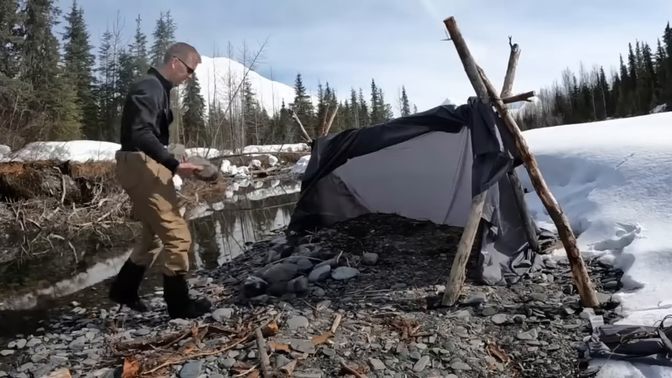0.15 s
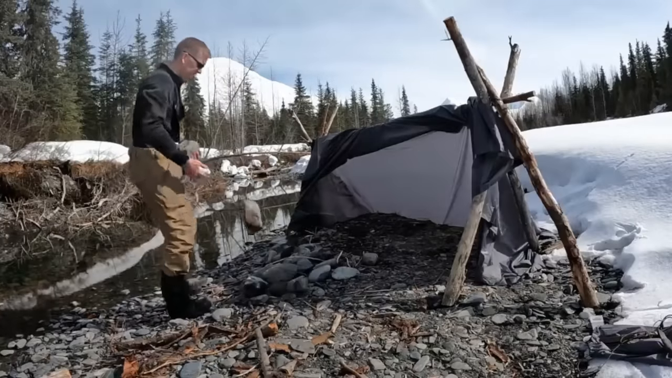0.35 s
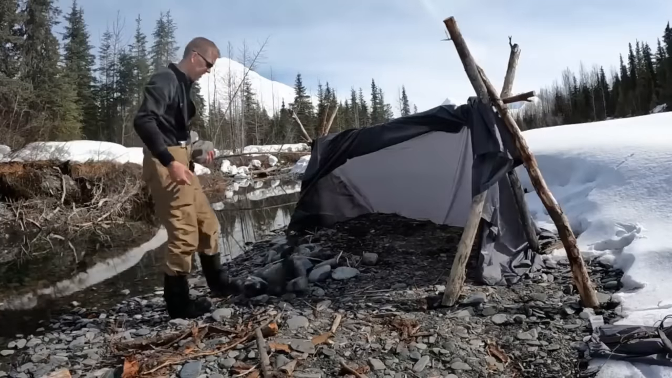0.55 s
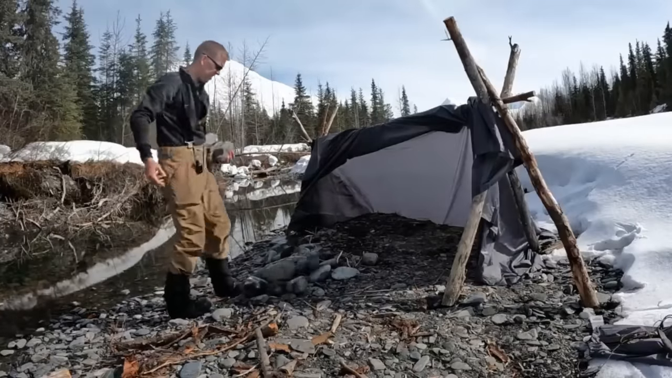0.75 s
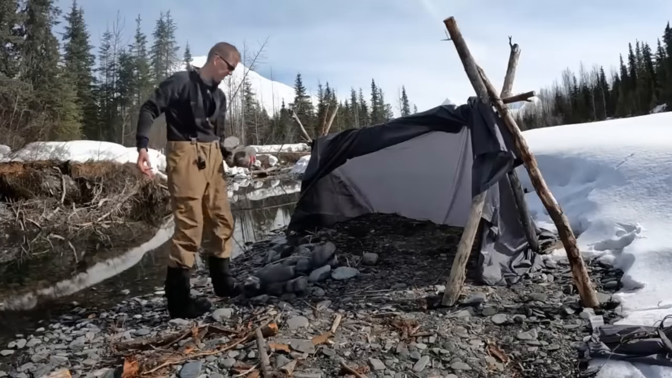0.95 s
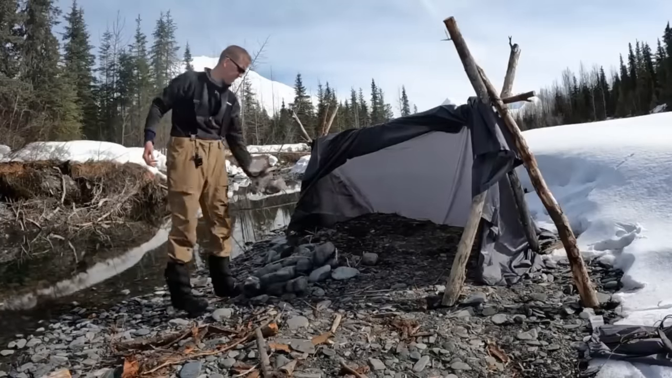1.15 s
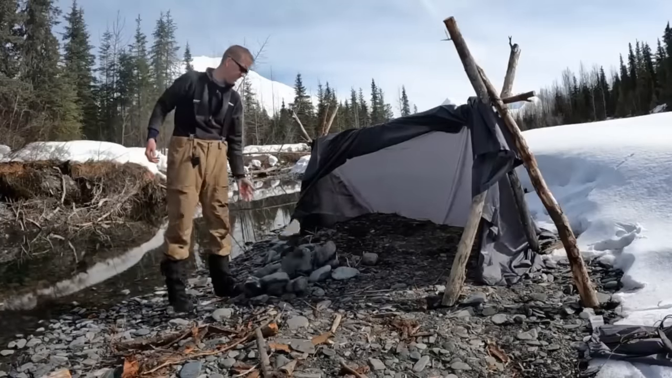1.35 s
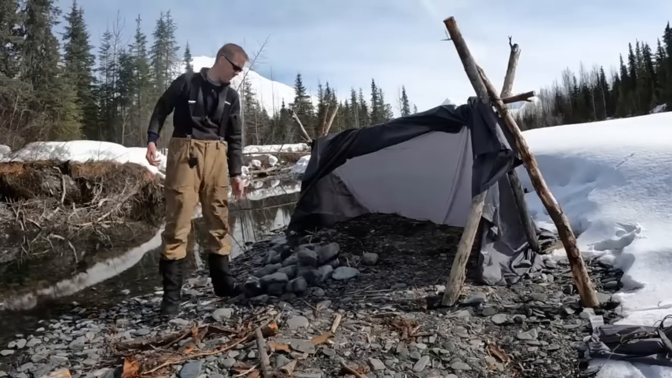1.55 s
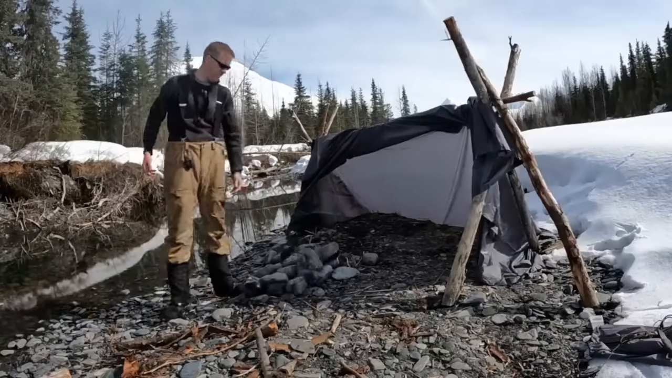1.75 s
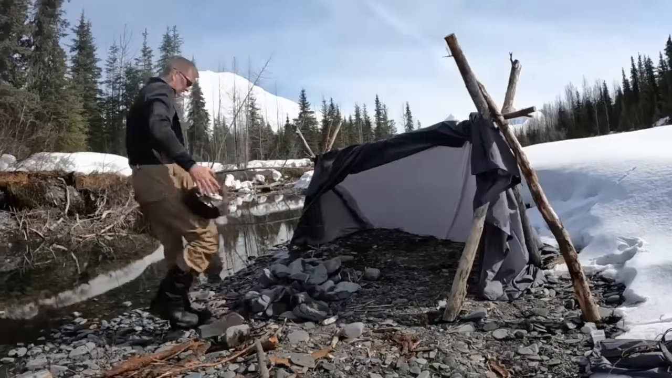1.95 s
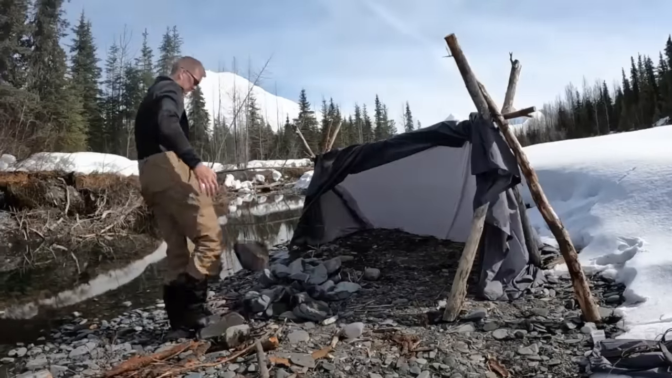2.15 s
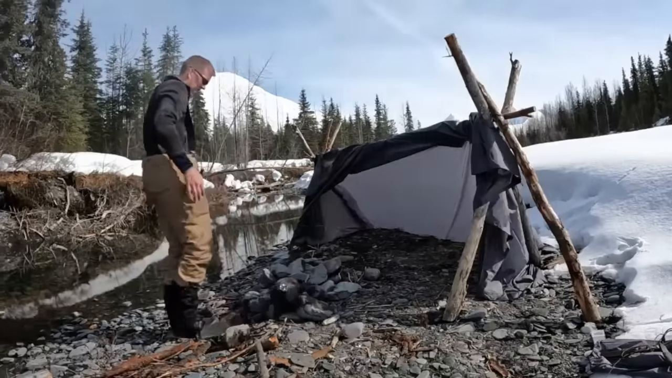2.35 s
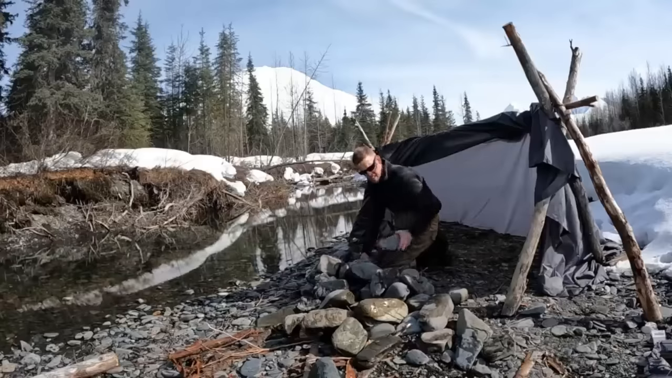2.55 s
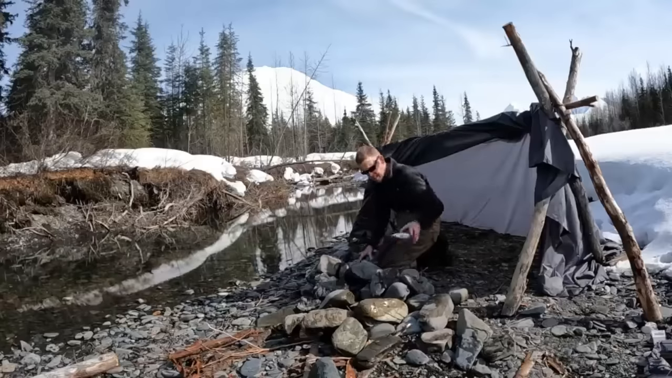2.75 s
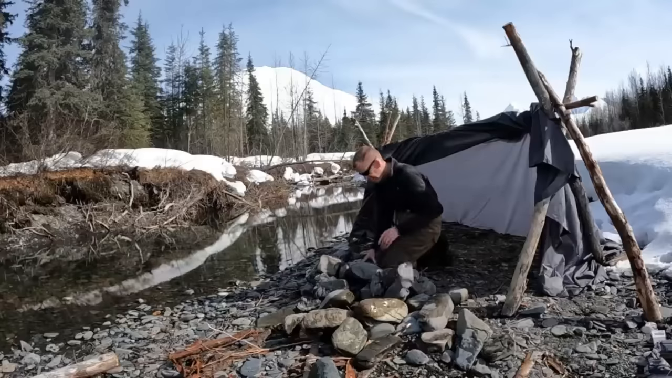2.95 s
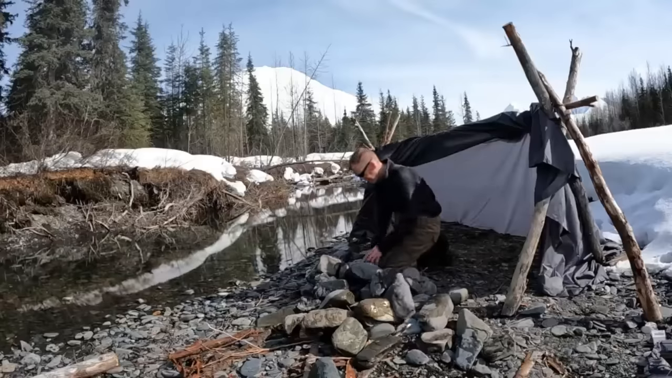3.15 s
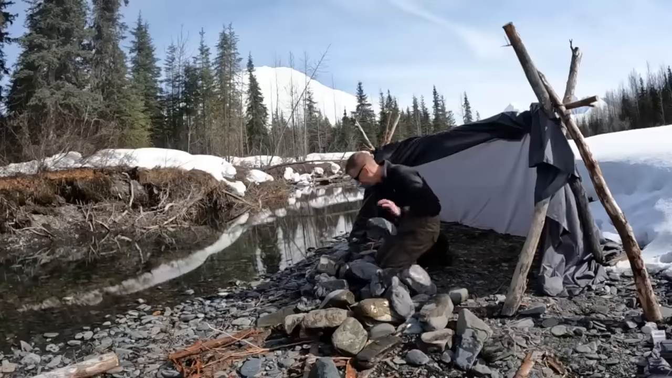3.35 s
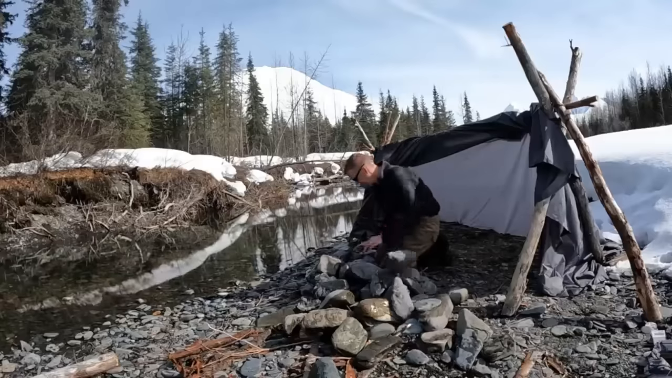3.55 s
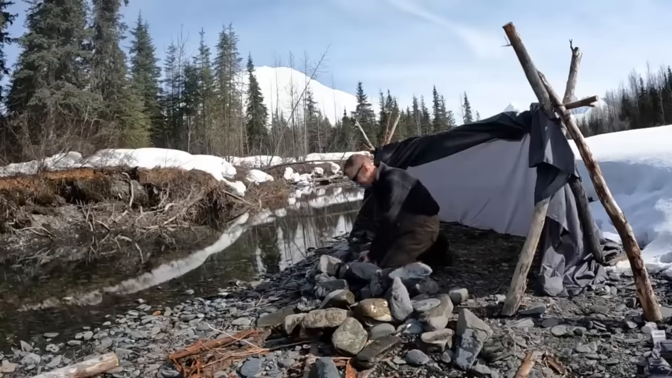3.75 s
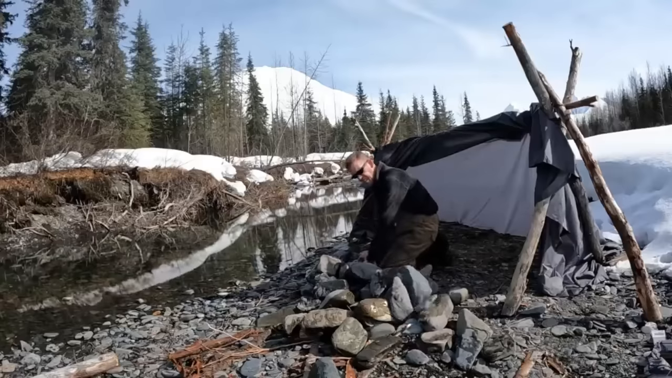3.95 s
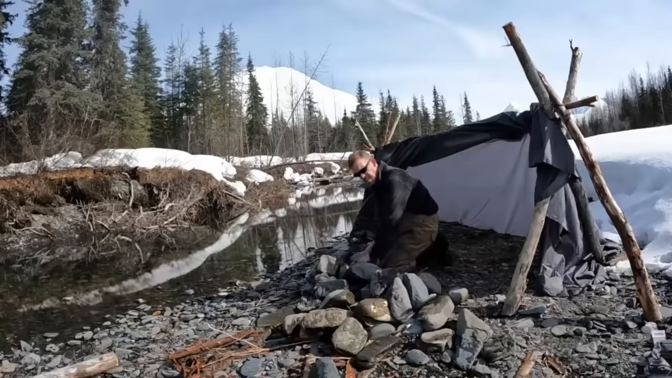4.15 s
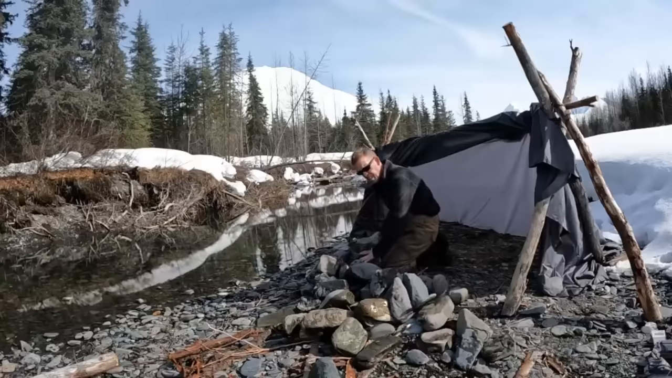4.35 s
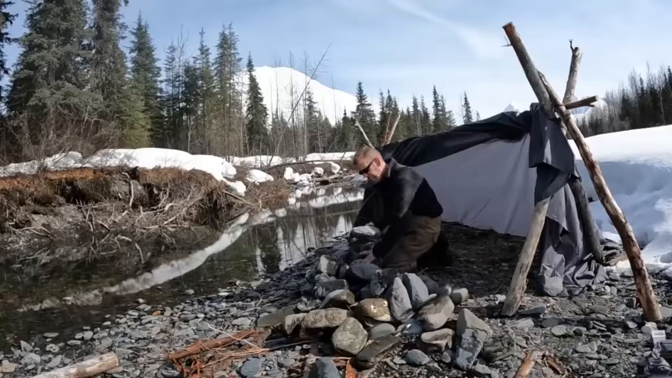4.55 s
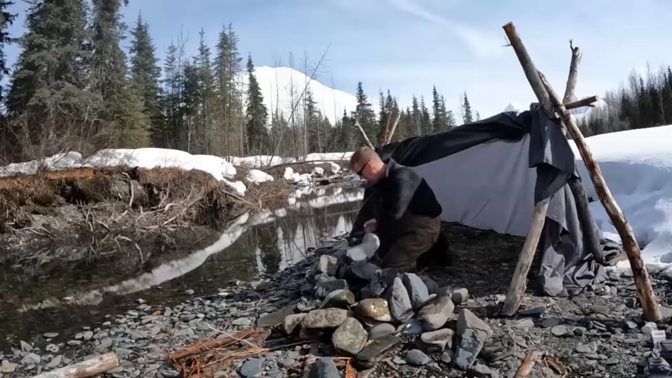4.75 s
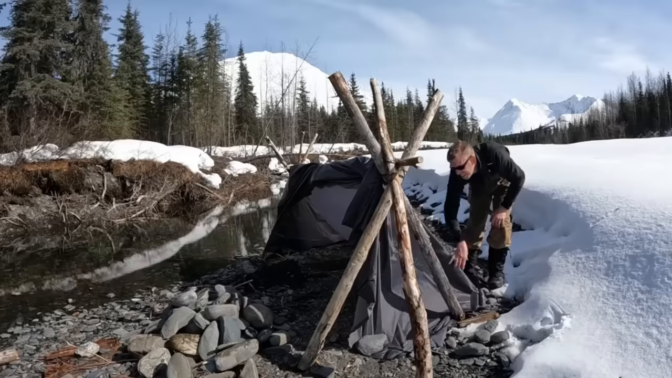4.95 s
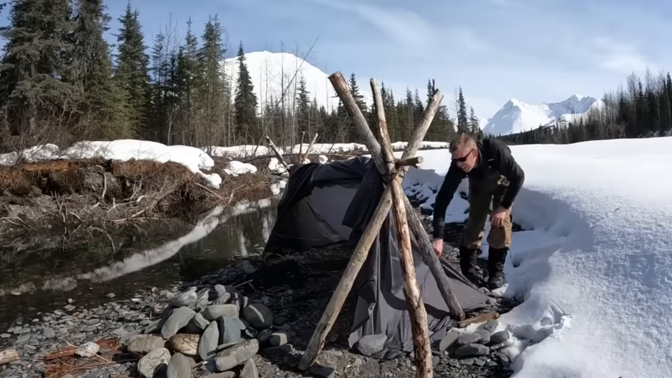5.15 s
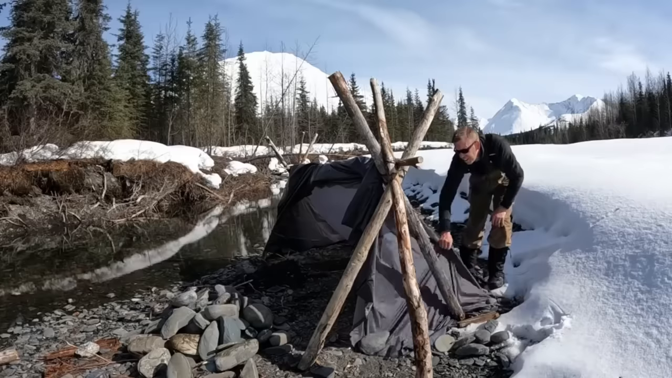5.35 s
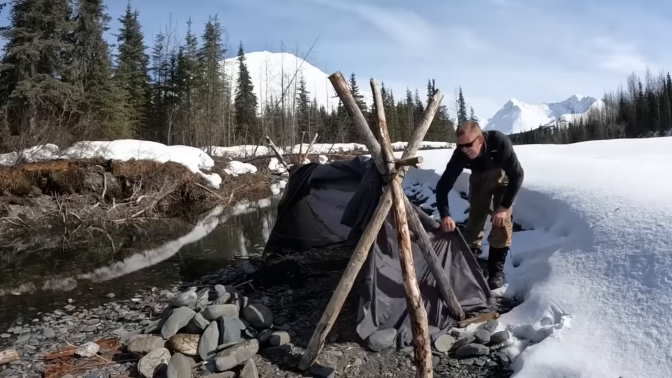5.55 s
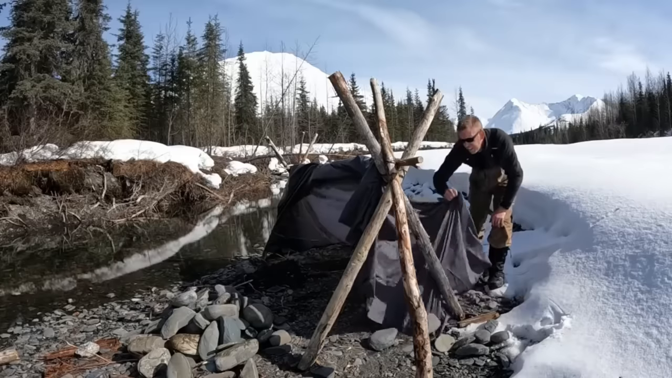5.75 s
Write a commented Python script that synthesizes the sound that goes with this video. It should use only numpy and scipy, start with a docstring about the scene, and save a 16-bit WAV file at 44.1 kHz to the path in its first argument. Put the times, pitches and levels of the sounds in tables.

```python
"""A gravel bank in open air: a person in waders drops and stacks river cobbles, a few metres from the microphone.
Stones clack as struck, dying resonances, heavy ones thud as sinking tones, and a flat slab clinks in its own modes.
Pebbles shift underfoot as showers of small resonant ticks; waders swish as coloured noise in strokes.
Light wind buffets the microphone as low noise, and at the end a tarp is dragged taut with a rising hiss."""
import sys
import numpy as np
from scipy import signal
from scipy.fft import rfft, irfft, next_fast_len
from scipy.io import wavfile

SR = 44100
rng = np.random.default_rng(int(sys.argv[2]) if len(sys.argv) > 2 else 0)


def store_wav(level_fs):
    """Save 16-bit WAV to argv[1]."""
    pcm = np.round(np.clip(np.atleast_2d(level_fs), -1, 1) * 32767)
    wavfile.write(sys.argv[1], SR, pcm.T.astype(np.int16))


N = 259729
HIT = 4096   # samples in one hit
AGE = np.arange(HIT) / SR   # seconds since the hit began


def from_db(db):
    """Decibels to gain."""
    return 10 ** (np.asarray(db) / 20)


def rms_one(x):
    """Scale to rms 1."""
    return x / np.sqrt(np.mean(x ** 2) + 1e-20)


def unit_hit(x):
    """Scale to the energy of one millisecond at rms 1."""
    return x / np.sqrt(np.sum(x ** 2) * 1000 / SR + 1e-20)


def cut(x, hz, kind, order=2):
    """Butterworth filter."""
    sos = signal.butter(order, np.minimum(hz, .45 * SR), kind, fs=SR, output="sos")
    return signal.sosfilt(sos, x + 1e-18)


def resonate(x, hz, width_hz):
    """One resonance, gain about 1 on top."""
    r = np.exp(-np.pi * width_hz / SR)
    zeros = np.array([1, 0, -1]) * (1 - r * r) / 2
    poles = [1, -2 * r * np.cos(2 * np.pi * hz / SR), r * r]
    return signal.lfilter(zeros, poles, x + 1e-18)


def fade(t60):
    """Exponential decay over the length of a hit, 60 dB in t60 seconds."""
    return np.exp(-np.log(1000) * AGE / t60)


def mode(hz, t60):
    """A struck, dying sine."""
    return np.sin(2 * np.pi * hz * AGE) * fade(t60)


def drift(rate):
    """Smooth random curve of rms 1, with rate new values per second."""
    knots = rng.standard_normal(int(N / SR * rate) + 3)
    return rms_one(np.interp(np.arange(N) / SR * rate, np.arange(len(knots)), knots))


def coloured(x, spectrum):
    """Give a steady texture its spectrum, rolled off below the lowest point; rms 1."""
    size = next_fast_len(N)
    hz, db = np.transpose(spectrum)
    freqs = np.arange(size // 2 + 1) * SR / size + 1
    low_rolloff = 1 + (hz[0] / 2 / freqs) ** 2
    gain = from_db(np.interp(np.log(freqs), np.log(hz), db)) / low_rolloff
    return rms_one(irfft(rfft(x, size) * gain, size)[..., :N])


def grains(per_s, spread_db):
    """Random clicks of uneven size."""
    happens = rng.random(N) < per_s / SR
    sign = rng.choice([-1, 1], N)
    return happens * sign * from_db(spread_db * np.minimum(rng.exponential(1, N), 4))


def stereo(mid, side, side_db):
    """Left and right from a shared and an opposed part."""
    return mid + from_db(side_db) * side * np.array([[1], [-1]])


def add(track, s, sound):
    """Mix a sound in at time s."""
    i = int(s * SR)
    track[i:i + len(sound)] += sound[:N - i]


def swells(rows, attack_s, release_t60, rise_db_per_s=0):
    """Gain of moves (start s, length s, dB): each swells up to its start, holds or rises, then dies away."""
    power = np.zeros(N)
    for start, length, db in rows:
        # the swell-up comes before the start, as far as time zero allows
        t = np.arange(-min(attack_s, start), length + 1.5 * release_t60, 1 / SR)
        attack = np.clip(1 + t / attack_s, 0, 1) ** 2
        release = np.exp(-np.log(1000) * np.maximum(t - length, 0) / release_t60)
        level = from_db(db + rise_db_per_s * np.clip(t, 0, length))
        add(power, start + t[0], (attack * release * level) ** 2)
    return np.sqrt(power)


def contact(tail_t60):
    """One sharp blow, and the micro-bounces and scatter from the stones around it, of equal energy."""
    scatter = rng.standard_normal(HIT) * fade(tail_t60) * (1 - np.exp(-AGE / 0.00018))
    return signal.unit_impulse(HIT), scatter / np.linalg.norm(scatter)


def stone_ring(hz, octaves, t60):
    """Every stone has short modes of its own, strongest near the pitch hz."""
    steps = octaves + rng.normal(0, .09, size=len(octaves))
    ring = 0
    for step in steps:
        ring = ring + rng.choice([-1, 1]) * from_db(-10 * step ** 2) * mode(hz * 2 ** step, t60)
    return unit_hit(ring)


# Stone knocking on stone, a few metres off.
# Each row: time in seconds, body level in dB over 1 ms relative to the other blows, colour in Hz.
COBBLES = [(0.138, -37.5, 1106), (0.615, -20, 1090), (0.6263, -4.5, 1580), (0.649, -26.5, 1320),
           (0.684, -21.5, 2030), (0.687, -9, 1912), (0.6975, -13, 1360), (0.7238, -29, 1000),
           (0.7346, -20, 860), (0.813, -26, 1000), (0.893, -31.5, 1280), (0.9239, -23.5, 1290),
           (0.9359, -20, 868), (0.9697, -31.5, 1190), (1.027, -27, 1015), (1.037, -15.5, 1440),
           (1.0616, -31.5, 1010), (1.1425, -35, 1670), (1.209, -20.5, 1297), (1.3685, -14.5, 1490),
           (1.412, -28, 1290), (1.4691, -26.5, 1450), (1.479, -6, 1470), (1.51, -10.5, 1432),
           (1.5145, -12, 1550), (1.5267, -21, 1560), (1.5479, -12, 2060), (1.5589, -11.5, 2090),
           (1.5625, -19, 1280), (1.571, -16.5, 1370), (1.614, -15.5, 1590), (1.6752, -19, 950),
           (1.875, -17, 1530), (1.9271, -24, 1394), (2.2372, -25.5, 1320), (2.3735, -30, 970),
           (2.3844, -7, 1015), (2.393, -18.5, 1210), (2.3985, -12.5, 1050), (2.401, -12.5, 1840),
           (2.435, -26.5, 1200), (2.4659, -15, 1744), (2.48, -29, 1230), (2.701, -26, 966),
           (3.009, -31.5, 1070), (3.052, -28.5, 1560), (3.0637, -7.5, 1756), (3.1421, -31.5, 1270),
           (3.1756, -11, 1490), (3.23, -25, 1080), (3.237, -17.5, 1380), (3.251, -39, 1200),
           (3.27, -16, 1366), (3.277, -21, 1340), (3.308, -36.5, 1046), (3.7021, -16, 1730),
           (3.7319, -5.5, 1650), (3.7495, -16.5, 1960), (3.7612, -19, 1150), (3.765, -16, 1810),
           (3.8856, -26, 1350), (3.9129, -23.5, 1240), (3.922, -21, 1270), (4.0616, -20.5, 1670),
           (4.0887, -21.5, 870), (4.101, -27.5, 1980), (4.1204, -25, 1030), (4.134, -18, 880),
           (4.1414, -12, 1060), (4.156, -21.5, 1190), (4.168, -27, 1380), (4.174, -16.5, 2010),
           (4.188, -22, 1340), (4.2245, -25.5, 850), (4.2324, -21, 1270), (4.269, -33.5, 1150),
           (4.4705, -20, 1810), (4.5396, -28, 1280), (4.666, -18, 1218), (4.6745, -26.5, 1410),
           (4.7208, -35.5, 1205), (5.2068, -9.5, 2277), (5.214, -13, 3395), (5.2234, -18, 3110),
           (5.3673, -20, 1525), (5.4115, -11, 2933)]


def cobbles(rise_cycles=0.49, tail_db=-4, ring_db=9, crack_db=-23, harder=0.75, ping_hz=3200, ping_db=-16):
    """Big stones meet softly and sound low, small ones high; the blow swells and dies within about two cycles."""
    out = np.zeros(N)
    for s, level_db, hz in COBBLES:
        press = AGE * hz / rise_cycles
        force = (press * np.exp(-press)) ** 2
        pulse = unit_hit(force * np.sin(2 * np.pi * hz * AGE))

        blow, scatter = contact(tail_t60=0.028)
        tail = unit_hit(cut(resonate(scatter, hz, 0.96 * hz), 2.2 * hz, "low", order=3))
        own_modes = stone_ring(hz, np.linspace(-.8, 1, num=6), t60=.028)
        ring = unit_hit(own_modes * (1 - np.exp(-press / 2)))
        after = unit_hit(tail + from_db(ring_db) * ring)
        body = unit_hit(cut(pulse + from_db(tail_db) * after, 310, "high"))

        # at the height of the blow the rough faces crack, more so on hard blows, and wake the high modes
        edge = np.roll(blow, force.argmax())
        crack = unit_hit(cut(edge + scatter / 2, [3800, 7000], "band"))
        crack = crack * from_db(harder * (level_db + 13.5))
        high_modes = stone_ring(ping_hz, np.linspace(-.5, .5, num=4), t60=0.018)
        ping = unit_hit(resonate(high_modes, ping_hz, ping_hz / 2))

        clack = body + from_db(crack_db) * crack + from_db(ping_db) * ping
        add(out, s - .0002, from_db(level_db) * clack)   # the swell begins 0.2 ms early
    return out


# Taps on the flat slab, heard beside the cobbles.
# Each row: time in seconds, level in dB over 1 ms, ring setting in dB (halved in gain against the click),
# pitch that the spot favours in Hz.
SLAB_TAPS = [(2.602, -42, -29, 2680), (2.6477, -22, -23, 2700), (2.8281, -28, 10, 2700),
             (2.8637, -23, 7, 2720), (2.886, -23.5, 13, 2740), (2.94, -33, 20, 1950), (2.957, -24, 9, 2720),
             (2.9776, -23, 7, 2700), (3.5457, -13.5, 6.5, 3430), (3.5708, -11, 26.5, 2690),
             (3.6029, -11.5, 1, 3170), (3.6178, -22.5, 17.5, 4570), (3.66, -33, 10, 3450),
             (3.705, -19, 18, 3500)]
# Bending modes of the slab. Each row: pitch in Hz, relative strength in dB, t60 in seconds (taps only).
SLAB_MODES = [(1068, 4, 0.016), (1910, 3, 0.015), (2682, 6.5, 0.024), (3050, -1, 0.036), (3460, -1, 0.011),
              (4520, -9.5, 0.052), (6200, -15, .025)]


def slab(scrape_db=-16, favour_db=10):
    """The flat stone answers each tap with a click and its bending modes, then scrapes a little as it settles."""
    out = np.zeros(N)
    for s, level_db, ring_db, favoured_hz in SLAB_TAPS:
        click = unit_hit(cut(resonate(sum(contact(tail_t60=0.022)), 1300, 1900), 1100, "high"))
        # where the tap lands decides how strongly each mode answers; the grip shifts their pitch a little
        grip = np.exp(rng.normal(0, .008))
        ring = 0
        for k, (hz, db, t60) in enumerate(SLAB_MODES):
            nearness = np.exp(-(10 * np.log2(hz / favoured_hz)) ** 2)
            answer_db = favour_db * nearness + rng.normal(0, 1.7)
            ring = ring + from_db(db + answer_db) * mode(grip * hz, t60) * (-1) ** k
        scrape = unit_hit(cut(rng.standard_normal(HIT), [1500, 4300], "band") * fade(0.079))
        tap = click + from_db(ring_db) * unit_hit(ring) / 2 + from_db(scrape_db) * scrape
        tap = cut(tap, 4570, "low", order=6)
        add(out, s, from_db(level_db) * unit_hit(tap))
    return out


# The slab grinding over other stones. Each row: start in seconds, length in seconds, level in dB.
SCRAPES = [(0.7, 0.0067, -38), (0.796, 0.0063, -36.5), (2.87, 0.124, -55.5), (3.61, 0.19, -49),
           (4.085, 0.025, -44), (4.177, 0.0036, -20.5)]
SCRAPE_ATTACK_S, SCRAPE_T60_S, SLIPS_PER_S = 0.0092, 0.043, 900


def scrapes(damped_width_hz=190):
    """Sliding, the slab sticks and slips; the tiny jerks ring its modes, damped by the contact."""
    slips = grains(SLIPS_PER_S, spread_db=1)
    ring = 0
    for k, (hz, db, _) in enumerate(SLAB_MODES):
        ring = ring + from_db(db) * (-1) ** k * resonate(slips, hz, damped_width_hz)
    grind = rms_one(cut(ring, 4600, "low", order=4))
    return swells(SCRAPES, SCRAPE_ATTACK_S, SCRAPE_T60_S) * grind


# Heavy stones landing on the ground.
# Each row: time in seconds, relative level in dB, pitch in Hz that the knock sinks to.
THUDS = [(0.627, -13.5, 98.5), (0.685, -18, 126), (1.037, -32.5, 156.5), (1.48, -23, 126),
         (1.513, -17, 139.5), (1.561, -23.5, 146), (2.385, -20.5, 125), (2.403, -16.5, 126),
         (3.064, -25, 121), (3.177, -17.5, 100.4), (3.735, -24, 110.4), (3.762, -21.5, 119),
         (4.141, -29, 119), (5.208, -40.5, 150)]


def thuds(overshoot=0.85, knock_t60=0.07, settle_db=1, settle_t60=0.14):
    """The gravel bed yields under a heavy stone: a knock that sinks in pitch, then a dull, longer settling."""
    out = np.zeros(N)
    sag = 1 + overshoot * np.exp(-AGE / 0.0045)
    onset = 1 - np.exp(-AGE / 0.0007)
    for s, level_db, hz in THUDS:
        knock = np.sin(2 * np.pi * np.cumsum(hz * sag) / SR) * fade(knock_t60)
        rumble = cut(rng.standard_normal(HIT), [0.46 * hz, 1.7 * hz], "band")
        settle = unit_hit(rumble * fade(settle_t60))
        add(out, s, from_db(level_db) * (2 * knock + from_db(settle_db) * settle) * onset)
    return out


# Sand crushed between stones. Each row: time in seconds, level in dB over 1 ms.
GRIT = [(0.6265, -30), (0.684, -26), (1.37, -35.5), (1.5144, -35.5), (1.57, -30.5), (1.882, -32),
        (2.193, -38.5), (2.3837, -27.5), (2.402, -31.5), (3.0617, -40), (3.176, -40.5), (3.731, -31),
        (3.765, -33.5), (4.351, -40.5), (5.213, -59)]


def grit(t60=0.03006):
    """Sand caught between two stones is crushed: a snap, then a short bright sizzle."""
    out = np.zeros(N)
    for s, level_db in GRIT:
        snap, sizzle = contact(t60)
        bright = cut(snap + sizzle, 4800, "high", order=4)
        add(out, s, from_db(level_db) * unit_hit(cut(bright, 6800, "low", order=3)))
    return out


# A boot or a hand shoving the gravel. Each row: start in seconds, length in seconds, level in dB.
SHUFFLES = [(0.0, 0.18, -67), (0.76, 0.5, -49), (1.13, 0.041, -63), (1.41, 0.033, -51), (1.62, 0.1, -50.5),
            (1.76, 0.11, -69), (1.92, 0.08, -57), (2.1, 0.017, -44), (2.2, 0.036, -37), (2.82, 0.54, -55.5),
            (3.62, 0.34, -47), (4.1, 0.15, -43.5), (4.3, 0.46, -56)]
SHUFFLE_ATTACK_S, SHUFFLE_T60_S = 0.023, 0.19
# Spectrum of the pebbles. Each row: frequency in Hz, relative gain in dB.
GRAVEL_COLOUR = [(180, 8), (400, -11.5), (1100, -8.5), (2000, -14), (3500, -21)]
# every cobble blow stirs the pebbles: their level relative to the blow, and how soon they come to rest
STIR_DB, STIR_ATTACK_S, STIR_T60_S = -29.5, 0.0034, 0.18
PEBBLE_TICKS_PER_S, PEBBLE_SPREAD_DB = 70, 4.5   # for each size of pebble; how uneven the ticks are


def gravel():
    """Pebbles grind and tip over when shoved or jolted: dull, uneven little clacks from stones of many sizes."""
    jolts = [(s + STIR_ATTACK_S, 0, level_db + STIR_DB) for s, level_db, _ in COBBLES]
    stirred = swells(jolts, STIR_ATTACK_S, STIR_T60_S)
    shoved = swells(SHUFFLES, SHUFFLE_ATTACK_S, SHUFFLE_T60_S)
    ticks = 0
    for hz in np.geomspace(200, 3600, num=18):
        touches = grains(PEBBLE_TICKS_PER_S, spread_db=PEBBLE_SPREAD_DB)
        clacks = resonate(resonate(touches, hz, .3 * hz), hz, .6 * hz)
        ticks = ticks + rms_one(clacks) * np.sqrt(hz)
    return np.hypot(stirred, shoved) * cut(coloured(ticks, GRAVEL_COLOUR), 5400, "low", order=4)


# Hollow tones of the pile. Each row: pitch in Hz, width in Hz, level in dB.
PILE_MODES = [(552, 208, -7), (1060, 170, -6), (1430, 110, -9)]


def pile(x):
    """The stones underneath take up each blow and add their hollow tones."""
    return x + sum(from_db(db) * resonate(x, hz, width) for hz, width, db in PILE_MODES)


def from_the_right(x, pan_db):
    """The right port hears the stones louder and one sample earlier."""
    return np.array([np.roll(x, 1) * from_db(-pan_db / 2), x * from_db(pan_db / 2)])


def cloth(spectrum, crinkle_db):
    """Woven fabric sliding: a fine hiss of threads with small crease snaps, in uneven strokes."""
    snaps = rms_one(grains(250, spread_db=3.0))
    rub = rng.standard_normal((2, N)) + from_db(crinkle_db) * snaps * [[1], [0]]   # snaps in the shared part
    strokes = from_db(2 * drift(70) + 1.2 * drift(14))
    return stereo(*coloured(rub, spectrum), side_db=-8.5) * strokes


# The waders rubbing with each move of a leg.
# Each row: start in seconds, length in seconds, relative level in dB.
SWISHES = [(0.0, 0.04, -57.5), (0.76, 0.28, -68), (1.16, 0.25, -78), (1.54, 0.13, -64), (1.9, 0.11, -64),
           (2.0, 0.12, -57.5), (2.21, 0.015, -53.5), (2.32, 0.15, -66), (4.35, 0.017, -62)]
# Clothes rustling faintly between the moves.
# Each row: start in seconds, length in seconds, relative level in dB.
FIDGETS = [(0.0, 2.3, -79), (2.653, 0.71, -75.5), (3.524, 1.258, -77)]
SWISH_ATTACK_S, SWISH_T60_S = 0.026, 0.18
# Spectrum of the fabric. Each row: frequency in Hz, relative gain in dB.
WADERS_COLOUR = [(450, 4.5), (3300, 5), (5200, -3.5), (7300, -1), (12000, -12), (15500, -45.5)]


def waders():
    """The legs swish past each other, over a faint rustle of clothes."""
    moves = swells(SWISHES + FIDGETS, SWISH_ATTACK_S, SWISH_T60_S)
    return from_db(9.0) * moves * cloth(WADERS_COLOUR, crinkle_db=-3.5)


# The tarp gathered in, then hauled. Each row: start in seconds, length in seconds, level in dB at the start.
PULLS = [(5.17, 0.035, -57.5), (5.21, 0.011, -46), (5.34, 0.036, -44), (5.5, 0.56, -40.5)]
PULL_ATTACK_S, PULL_T60_S = 0.093, 0.36
TIGHTEN_DB_PER_S = 13   # the sheet hisses louder the longer it is pulled
# Folds of the tarp collapsing. Each row: start in seconds, length in seconds, level in dB.
CRUMPLES = [(5.34, 0.05, -46.5), (5.53, 0.073, -46), (5.62, 0.041, -41), (5.78, 0.027, -38.5)]
CRUMPLE_ATTACK_S, CRUMPLE_T60_S = 0.071, 0.16
# Spectrum of the sheet. Each row: frequency in Hz, relative gain in dB.
TARP_COLOUR = [(300, -2), (750, -7), (1300, -1), (3200, -2), (6000, -8), (8500, -16.5), (12000, -20.5),
               (15500, -43)]


def tarp():
    """The sheet hisses as it slides, louder as it tightens; its folds crumple low, in slow bunches."""
    pull = swells(PULLS, PULL_ATTACK_S, PULL_T60_S, TIGHTEN_DB_PER_S)
    crumple = swells(CRUMPLES, CRUMPLE_ATTACK_S, CRUMPLE_T60_S)
    folds = rms_one(cut(grains(500, spread_db=3.0), [130, 560], "band"))
    return pull * cloth(TARP_COLOUR, crinkle_db=-5.5) + crumple * folds


def bank(x, t60):
    """Open air: a faint scatter from the stony ground and the trees, different at each ear."""
    age = np.arange(SR // 2) / SR
    envelope = np.exp(-np.log(1000) * age / t60) * (1 - np.exp(-age / 0.0036))
    echo = cut(rng.standard_normal((2, len(age))) * envelope, 4800, "low", order=1)
    echo = echo / np.sqrt(np.sum(echo ** 2) / 2)
    return signal.fftconvolve(x[None], echo, axes=1)[:, :N]


# Gusts on the microphone. Each row: start in seconds, length in seconds, relative level in dB.
GUSTS = [(0.38, 0.37, -42.5), (2.07, 0.11, -37), (5.68, 0.019, -44.5)]
GUST_ATTACK_S, GUST_T60_S = 0.19, 0.88
BREEZE_DB = -64.5   # relative, like the gusts
# Spectrum of the buffeting. Each row: frequency in Hz, relative gain in dB.
WIND_COLOUR = [(25, -1.5), (50, -9.5), (100, -11.5), (400, -64)]


def wind():
    """Lumpy low buffeting on the microphone ports: a light breeze with a few gusts."""
    lumps = from_db(2 * drift(18))
    strength = from_db(BREEZE_DB) + swells(GUSTS, GUST_ATTACK_S, GUST_T60_S)
    buffeting = stereo(*coloured(rng.standard_normal((2, N)), WIND_COLOUR), side_db=-7.5)
    return from_db(-0.5) * strength * lumps * buffeting


# Spectrum of the still air. Each row: frequency in Hz, relative gain in dB.
AIR_COLOUR = [(40, 8), (300, -17), (1400, -30.5), (4500, -42), (12000, -45), (15500, -56)]


def still_air():
    """The still air of the valley: a faint, steady, mostly low noise."""
    hush = coloured(rng.standard_normal((2, N)), AIR_COLOUR)
    return from_db(-61.0) * stereo(*hush, side_db=-7.0)


def scene():
    """Stones and gravel a little to the right, thuds and grit in the middle, cloth, wind and still air."""
    stones = pile(from_db(-0.5) * cobbles() + slab() + scrapes() + gravel())
    near = from_the_right(stones, pan_db=2.0) + grit() + thuds()
    scatter = from_db(-25.5) * bank(stones, t60=0.085)
    return near + scatter + waders() + tarp() + wind() + still_air()


CUTOFF_HZ = 16200


def record(dry):
    """The loudest peaks are rounded and the top is cut."""
    rounded = 1.2 * np.tanh(dry / 1.2)
    # the filter is 70 dB down from 600 Hz above the cutoff
    top_cut = signal.cheby2(12, 70, CUTOFF_HZ + 600, fs=SR, output="sos")
    return signal.sosfilt(top_cut, rounded)


dry = scene()
out = record(dry)
store_wav(out)
```